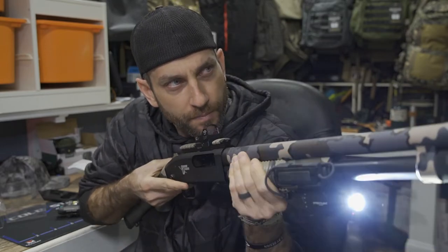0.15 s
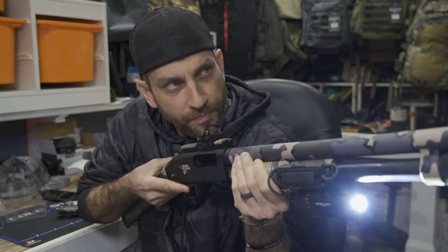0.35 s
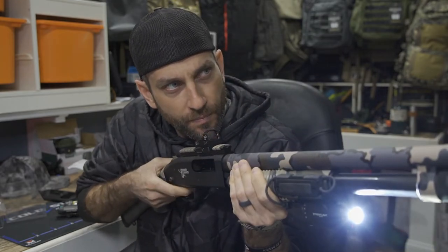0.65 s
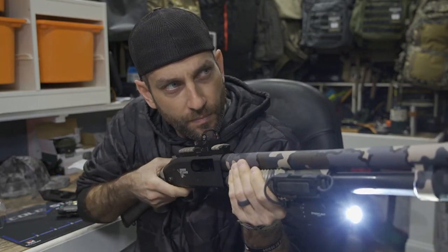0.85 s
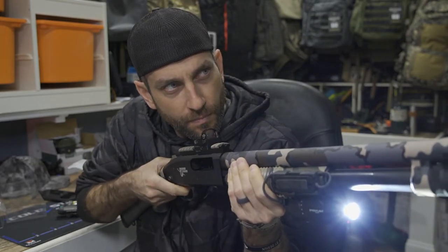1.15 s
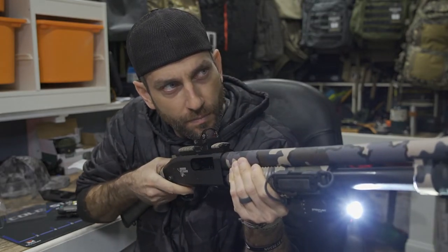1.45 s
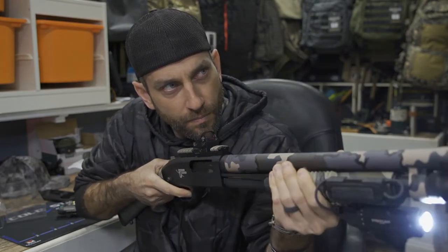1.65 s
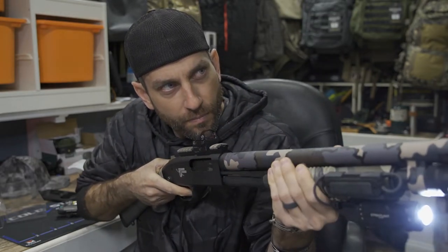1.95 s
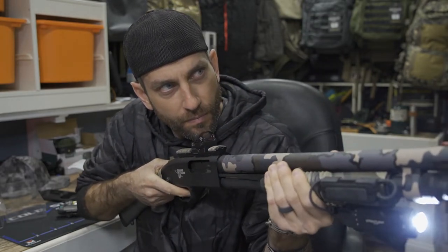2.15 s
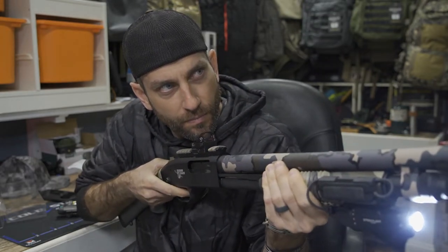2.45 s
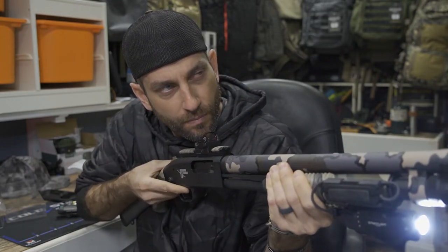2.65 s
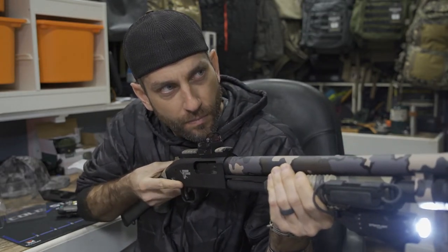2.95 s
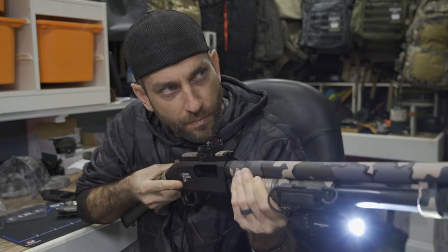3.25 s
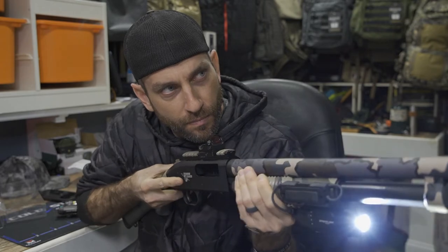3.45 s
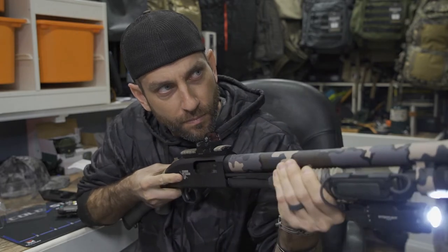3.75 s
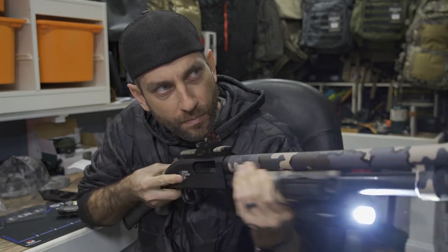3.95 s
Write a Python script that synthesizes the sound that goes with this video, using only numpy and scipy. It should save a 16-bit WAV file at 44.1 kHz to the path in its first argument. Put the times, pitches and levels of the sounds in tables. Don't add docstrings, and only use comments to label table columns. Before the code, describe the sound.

Close to the microphone in a small cluttered room, a shotgun forend is pulled back at once with a rattling scrape and hard clack. Faint clicks and cloth rubs follow, then a forward slam, a pause with a sharper handling click, and three quick strokes near the end. Thin high ringing hangs after the earlier slams.

```python
import sys
import numpy as np
from scipy import signal
from scipy.fft import rfft, irfft, next_fast_len
from scipy.io import wavfile
from scipy.ndimage import uniform_filter1d

SR = 44100
rng = np.random.default_rng(int(sys.argv[2]) if len(sys.argv) > 2 else 0)


def wav_out(sig):
    wavfile.write(sys.argv[1], SR, np.round(np.clip(np.atleast_2d(sig).T, -1, 1) * 32767).astype(np.int16))


def makeup_ratio(level_db):
    decades = np.asarray(level_db, float) / 20
    return 10 ** decades


N = 180721
TIME = np.arange(N) / SR
SLOT = 4096

# pitch in Hz, width in Hz, level in dB.
STOCK_RING = [(145, 49, -9.5), (283.3, 300, -7.5), (582, 230, 0), (968, 230, -3.5)]
# pitch in Hz, width in Hz, level in dB.
LOCKED_EDGES = [(6330, 1200, -0.5), (8860, 3200, -1.5), (11500, 3000, -6)]
# pitch in Hz, width in Hz, level in dB.
SLIDING_EDGES = [(5500, 1900, -1), (7800, 710, 1), (11700, 13000, -11.5)]


def soften(x, hz, kind):
    return signal.sosfilt(signal.butter(2, hz, kind, fs=SR, output="sos"), x)


def response(modes, size):
    hz = np.fft.rfftfreq(size, 1 / SR) + 1e-3
    gain = 0
    for k, (centre, width, db) in enumerate(modes):
        detuning = (hz / centre - centre / hz) * centre / width
        gain = gain + (-1) ** k * makeup_ratio(db) / (1 + 1j * detuning)
    return gain / np.sqrt(np.mean(abs(gain) ** 2))


def resonate(x, modes):
    size = 2 * next_fast_len(N // 2 + SLOT)
    return irfft(rfft(x, size) * response(modes, size=size))[:N]


def gritty(spread_db, rate):
    hold = int(SR / rate)
    steps = np.repeat(rng.standard_normal(N // hold + 1), hold)[:N]
    jumps = uniform_filter1d(steps, hold)
    x = rng.standard_normal(N) * makeup_ratio(spread_db * jumps)
    return x / np.std(x)


def steel(body, barrel, receiver, treble, bright, grit_db, stock_db):
    # pitch in Hz, width in Hz, level in dB.
    rubbed_receiver = [(1020, 500, -5), (1660, 630, -1)]
    out = resonate(barrel * gritty(grit_db, 1500), body)
    out = out + resonate(receiver * gritty(grit_db, 1500), rubbed_receiver)
    out = out + resonate(treble * gritty(grit_db, 2500), bright)
    return out + makeup_ratio(stock_db) * resonate(receiver * gritty(0, 1000), STOCK_RING)


def knocks(table, bright, stock_db, tick=2.5, after_db=-17, after_ms=17.0, grip=0.99):
    # pitch in Hz, width in Hz, level in dB.
    barrel_ring = [(2499, 300, -5.5), (2764, 260, 0), (3080, 160, 0), (3300, 190, -0.5), (3600, 230, 2),
                   (3783, 480, -1.5), (4600, 970, -5), (5900, 620, -11.5)]
    # pitch in Hz, width in Hz, level in dB.
    receiver_ring = [(1130, 440, -10), (1432, 170, -5), (1684.6, 160, 2.5), (2190, 510, -7)]
    spot_width_hz, spot_boost_db = 450, 7
    push = np.array([1.4, 2.2, 1.3, 1.8])
    out, t_ms = np.zeros(N + SLOT), np.arange(SLOT) * 1000 / SR
    gripped = [(hz, width * grip, db) for hz, width, db in receiver_ring]
    other_parts = [response(modes, size=SLOT) for modes in (gripped, bright, STOCK_RING)]
    for start, blow_db, spot_hz, receiver_db, treble_db, contact_ms in table:
        u = t_ms / contact_ms
        touching = np.clip(u / 0.81, 0, 1) * np.exp(-np.clip(u - 0.6, 0, None) * 2.4)
        rattle = makeup_ratio(after_db) * np.exp(-t_ms / after_ms)
        force = rng.standard_normal((4, SLOT)) * (touching + rattle) * np.clip((40 - t_ms) / 15, 0, 1)
        force[:, int(0.2 * contact_ms * SR / 1000)] += tick * np.sqrt(contact_ms) * push
        near = [(hz, width * grip, db + spot_boost_db * np.exp(-((hz - spot_hz) / spot_width_hz) ** 2))
                for hz, width, db in barrel_ring]
        parts = np.array([response(near, size=SLOT)] + other_parts)
        rung = irfft(rfft(force) * parts) * (t_ms < 80)
        peak = np.sqrt(2 * uniform_filter1d(rung ** 2, 64).max(axis=1))
        part_db = blow_db + np.array([0, receiver_db, treble_db, 0.32 * receiver_db + stock_db - 8.5])
        i = int((start - contact_ms * 0.15 / 1000) * SR)
        out[i:i + SLOT] += (makeup_ratio(part_db) / peak) @ rung
    return out[:N]


def timed(table, ms):
    rows = np.array(table)
    return np.column_stack([rows, ms * np.exp(-0.012 * (rows[:, 1] + 30))])


def quiet():
    # pitch in Hz, level in dB per Hz.
    air_shape = [(20, -3), (60, 1.5), (100, -6), (180, -2.5), (300, -12.5), (1000, -19), (5000, -29),
                 (15600, -35.5)]
    # pitch in Hz, level in dB.
    hum_tones = [(59.2, -78.5), (414.5, -81.5)]
    hz, db = np.transpose(air_shape)
    f = np.fft.rfftfreq(N, 1 / SR) + 1
    shape = makeup_ratio(np.interp(np.log(f), np.log(hz), db, -90, -90))
    air = irfft(rfft(rng.standard_normal(N)) * shape, N)
    waver_db = -2.5 * np.interp(TIME, np.arange(60) / 12, rng.standard_normal(60))
    hum = sum(makeup_ratio(d + 2.5 + waver_db) * np.sin(2 * np.pi * h * TIME) for h, d in hum_tones)
    return air * makeup_ratio(-69.5) / np.std(air) + hum


def shifting_hands():
    # loudest moment in seconds, level in dB, swelling in dB/s, dying in dB/s, treble in dB.
    rustles = [(0, -63, 300, 400, -14.5), (.36, -71.5, 70, 99.5, -13), (.48, -64, 330.5, 142.5, -14.5),
               (.92, -67.5, 130.5, 148.5, -11), (1.39, -70, 399.5, 300, -16.5),
               (1.46, -59.5, 422, 323, -12), (2.2, -75.5, 500, 63, -18.5), (2.27, -55, 398, 407, -11),
               (2.51, -69.5, 300, 61.5, -8), (2.58, -67.5, 128, 254.5, -3.5),
               (2.73, -59.5, 165, 229.5, -11.5), (2.88, -80, 42.5, 60, -11.5), (3.33, -71.5, 299, 94, -14),
               (3.501, -63, 207, 897, -7.5), (3.89, -75, 84.5, 900, -9.5)]
    # pitch in Hz, width in Hz, level in dB.
    sleeve = [(2440, 1000, -2.5), (3600, 650, 3.5)]
    rub, treble = 0, 0
    for loudest, db, swelling, dying, treble_db in rustles:
        slope = np.where(TIME < loudest, swelling, dying)
        shift = makeup_ratio(db - slope * abs(TIME - loudest))
        rub, treble = rub + shift, treble + makeup_ratio(treble_db) * shift
    return steel(sleeve, rub, rub * makeup_ratio(-2), treble, SLIDING_EDGES, grit_db=2.0, stock_db=-8.0)


def loose_taps():
    # start in seconds, blow in dB, pitch of the struck spot in Hz, receiver in dB next to the blow.
    tap_times = [(0.0461, -31.5, 3400, -13.5), (0.3592, -57, 3380, -6), (0.3908, -67.5, 2500, 3),
                 (0.5805, -51, 3570, -5), (0.5984, -63.5, 3460, 5.2), (0.83, -66, 3230, -3),
                 (1.3986, -64, 2740, -1), (2.2154, -52, 3320, 0.8), (2.6564, -54, 3100, 10),
                 (2.9797, -56, 3600, -9), (2.999, -46, 3650, 1)]
    rows = timed([(*row, -23) for row in tap_times], 2.2)
    taps = knocks(rows, LOCKED_EDGES, stock_db=-24.5, tick=1.2, after_db=-11.5, grip=1.1)
    return soften(taps, 5000, "low")


def stroke(table, last_hz):
    first_hz, scatter_hz = 3250, 180
    rows = np.array(table)
    along = (rows[:, 0] - rows[0, 0]) / (rows[-1, 0] - rows[0, 0])
    spot = first_hz + (last_hz - first_hz) * along + scatter_hz * rng.standard_normal(len(rows))
    return np.insert(rows, 2, spot, axis=1)


def pump_strokes():
    # start in seconds, blow in dB, receiver in dB and treble in dB
    # next to the blow, contact in ms.
    back_1 = [(0.0549, -11.5, -5.5, -9, 4.4), (0.0649, -13, -10, -0.5, 2.35), (0.0713, -17, -5, -12.5, 4.1),
              (0.0759, -14.5, -5.5, -5.5, 7), (0.0815, -16.5, -5, -6.5, 2.8), (0.0901, -15, -5, -9, 2.1),
              (0.0987, -12, -13.5, -5, 3), (0.1097, -11.5, -19, -7.5, 3), (0.1141, -10.5, -17, -2.5, 2.1),
              (0.1217, -13, -10, -0.04, 5.3), (0.1246, -17, -9.5, 0.75, 7.6), (0.144, -2, -10.5, -1, 3.7),
              (0.1589, -10, 1.6, -0.3, 4.3), (0.1791, -16, -10.5, -9.5, 5.6),
              (0.1854, -15.5, -13.5, -8.5, 5.3)]
    # seconds, dB, dB, dB, ms.
    forward_1 = [(1.5609, -20, -5, -14, 2.3), (1.5653, -24, -4.5, -5, 5.9), (1.5712, -21.5, -5, -4, 4.4),
                 (1.5766, -9, -8, -9, 3.3), (1.584, -17.5, -8, -13.5, 2.2), (1.5892, -17, -8.5, -13.5, 2.1),
                 (1.5976, -12.5, -5.5, 1, 2.9), (1.6031, -11, -10, -1.5, 4.9),
                 (1.633, -9.5, -5.5, -12, 3.0), (1.6622, -9, -10.5, -12.5, 3.3),
                 (1.6639, -2, -11, -7.5, 2.7), (1.6743, -8, -9.5, 2, 2.9), (1.6791, -9, -6, -3, 2.5),
                 (1.6841, -4, -11, -3.5, 3.1), (1.7067, -12.5, -9.5, -8, 3.9),
                 (1.7145, -12.5, -16, -12, 2.2), (1.7241, -13.5, -17.5, -7.5, 6.7)]
    # seconds, dB, dB, dB, ms.
    back_2 = [(3.011, -11.5, -2, -12, 4.8), (3.027, -17.5, -2, -0.9, 2.1), (3.0358, -13, -4.5, -4, 3.3),
              (3.041, -11.5, -5.5, -9.5, 4.5), (3.071, -21, -5, -4.5, 3.3), (3.0807, -21, -7, -2, 1.8),
              (3.0988, -13.5, -18, -7, 3.1), (3.1202, -21.5, -3, -8.5, 2.3), (3.126, -13.5, -17.5, -5, 4.4),
              (3.1307, -16, -8, -3.5, 4.4), (3.1371, -13, -6, -5, 4.5), (3.1552, -2.5, -7.5, -3.5, 3.2),
              (3.1742, -7.5, 0.5, 0.6, 3.3), (3.1958, -14.5, -7.5, -8.5, 2.1), (3.204, -20, -7, -4.5, 3.9)]
    # seconds, dB, dB, dB, ms.
    forward_2 = [(3.5206, -22.5, 0.5, -4, 3.0), (3.5304, -12, -11, -6, 3), (3.5343, -10, -13.5, -11.5, 2.1),
                 (3.538, -16.5, -3.5, -3, 6.5), (3.5467, -15, -7.5, -8.5, 4.7), (3.554, -11, -4.5, 1, 8),
                 (3.576, -14, -11.5, -5.5, 3.3), (3.5834, -2, -10, -9.5, 3.9), (3.6106, -3, -16, -7, 4.7),
                 (3.618, -10.5, -9.5, -3.5, 1.3), (3.6223, -5.5, -4, 1.3, 4.7),
                 (3.6312, -8, -6.5, -0.2, 2.9), (3.6518, -13, -12.5, -12.5, 3.9),
                 (3.658, -14, -22, -8, 1.6), (3.665, -13, -17.5, -12, 4.7), (3.6738, -13, -12, -11.5, 3.9)]
    # seconds, dB, dB, dB, ms.
    back_3 = [(3.9088, -9, -10.5, -5, 2.6), (3.9124, -17, -4, -13, 5.9), (3.9249, -8.5, -7, -8.5, 4.6),
              (3.9329, -12, -14, -2, 3.1), (3.9392, -13.5, -4.5, -8.5, 1.7),
              (3.9449, -13, -10.5, -2.5, 5.5), (3.9496, -13.5, -7.5, -3, 7.2),
              (3.9649, -12.5, -13.5, -10, 1.8), (3.9746, -13, -11.5, -3, 2.7),
              (3.9803, -12, -16.5, -5.5, 2.3), (3.9887, -8, -17, 1, 4.5), (4.0063, 0.2, -12.5, -7.5, 2.9),
              (4.021, -8, -3.25, 1.5, 3.5), (4.038, -16, -8, -4.5, 2.4)]
    # start in seconds, blow in dB, pitch of the struck spot in Hz,
    # receiver in dB and treble in dB next to the blow.
    slack = [
        (1.542, -32, 3840, -3, -6),
        (3.5044, -32, 4050, -3.4, -14),
        (3.886, -18, 2708, -6.5, -22),
    ]
    # pitch in Hz, width in Hz, level in dB.
    moving_edges = [(6190, 1100, 5), (9050, 1800, 2.5), (11740, 3300, 1), (14000, 1800, -1)]
    strokes = [stroke(rows, 3940) for rows in (back_1, back_2, back_3)]
    strokes += [stroke(rows, 4031) for rows in (forward_1, forward_2)]
    return knocks(np.vstack(strokes + [timed(slack, 0.8)]), moving_edges, stock_db=-13.5)


def sliding():
    # start in seconds, slide in dB, loudest moment in seconds, loudest in dB, dying in dB/s.
    scrapes = [
        (.056, -27, 0.16, -18, 380.5),
        (1.575, -25.5, 1.694, -22, 309.5),
        (3.012, -29, 3.185, -23, 411),
        (3.54, -23.5, 3.6433, -21, 311),
        (3.915, -26.5, 4.025, -16.5, 418.5),
    ]
    creep_s, swell_s, shoulder_s, settle_s = 0.0056, 0.055, 0.033, 0.038
    slide, shiver, treble = 0, 0, 0
    for start, slide_db, loudest, loud_db, dying in scrapes:
        s = [start - creep_s, start, loudest - swell_s, loudest, loudest + shoulder_s]
        db = np.interp(TIME, s, [slide_db - 26.5, slide_db, slide_db, loud_db, loud_db - 4.5])
        db = db - 601 * np.clip(s[0] - TIME, 0, 1)
        gain = makeup_ratio(db - dying * np.clip(TIME - s[-1], 0, 1))
        treble_db = np.interp(TIME, s[:2] + [loudest, loudest + 0.2], [-22, -16, -5.5, -9.5])
        settled = np.clip((TIME - loudest) / settle_s, 0, 1)
        slide = slide + gain * np.sqrt(1 - settled)
        shiver = shiver + gain * np.sqrt(settled)
        treble = treble + gain * makeup_ratio(treble_db)
    return slide, shiver, treble


def scraping_bars():
    # pitch in Hz, width in Hz, level in dB.
    tube = [(2520, 990, -6), (3500, 890, -0.5), (4060, 830, -2)]
    # pitch in Hz, width in Hz, level in dB.
    loose_parts = [(2600, 980, -9), (3855, 630, 1.5), (4740, 1200, -2.5), (5740, 1000, -7)]
    slide, shiver, treble = sliding()
    grain = makeup_ratio(18 * uniform_filter1d(rng.standard_normal(N), 150))
    receiver = slide * makeup_ratio(-11.0) + shiver * makeup_ratio(-17)
    bars = steel(tube, slide * grain, receiver * grain, treble * grain, SLIDING_EDGES, grit_db=0.1, stock_db=-7.5)
    return bars + resonate(shiver * makeup_ratio(-0.15) * gritty(1.6, 600), loose_parts)


def slams():
    # start in seconds, lower boom in dB, upper boom in dB, air jolt in dB.
    slam_times = [
        (.15, -39.5, -39.5, -59),
        (1.685, -38.5, -51, -45),
        (3.175, -49.5, -42.5, -40.5),
        (3.63, -41, -47.5, -35.5),
        (4.007, -37, -34.5, -28.5),
    ]
    # pitch in Hz, time to fall 60 dB in seconds.
    boom_tones = [(178, 0.26), (218, 0.28)]
    out = np.zeros(N)
    for start, *boom_db, jolt_db in slam_times:
        t = np.clip(TIME - start, 0, None)
        for (hz, t60), db in zip(boom_tones, boom_db):
            out += makeup_ratio(db - 60 * t / t60) * (1 - np.exp(-t / 0.0033)) * np.sin(2 * np.pi * hz * t)
        out += makeup_ratio(jolt_db - 3.5) * np.exp(-t / 0.01) * np.sin(2 * np.pi * 84 * t)
    return soften(out, 37, "high")


def tone(hz, start, stop, db, t60):
    t = np.clip(TIME - start, 0, None)
    damping = np.clip((stop - TIME) / 0.0041, 0, 1)
    return damping * makeup_ratio(db - 60 * t / t60) * np.sin(2 * np.pi * hz * t)


def singing():
    # struck in seconds, damped in seconds, low tone in dB, its 60 dB fall in seconds, high tone in dB.
    rings = [
        (0.153, 1.42, -55.5, 1.9, -79.5),
        (1.684, 2.9, -49, 1.2, -62.5),
        (3.174, 3.525, -52.5, 1.06, -89.5),
        (3.639, 3.906, -38, 1.43, -50),
    ]
    pitches = (9103.5, 12340)
    start, stop, db, t60 = rings[0][:4]
    out = tone(pitches[0] - 40, start, stop, db - 12, t60)
    for start, stop, low_db, low_t60, high_db in rings:
        out = out + tone(pitches[0], start, stop, low_db, low_t60)
        out = out + tone(pitches[1], start, stop, high_db, 0.9)
    return out


def handling_clicks():
    # start in seconds, blow in dB, pitch of the struck spot in Hz,
    # receiver in dB and treble in dB next to the blow.
    click_times = [(0.4839, -32, 3170, -3, -24), (0.9526, -42.5, 2530, -7.5, -14),
                   (2.2326, -20, 3078, -6.5, -18), (2.2493, -25.5, 3428, -6, -10.5),
                   (2.693, -50.5, 3000, -8, -16), (2.7023, -31, 3410, -2, -12.5),
                   (2.707, -31.5, 3300, -15, -11.5), (2.7118, -15.5, 3500, -9.5, -7.5),
                   (2.7159, -27, 3290, -10, -16), (2.7197, -26, 3807, -11, -21.5),
                   (2.7316, -33, 3320, -19, -11.5), (3.8555, -57, 3010, -3.5, -16),
                   (3.8816, -37, 3600, 2.2, 1)]
    clicks = knocks(timed(click_times, 1.9), LOCKED_EDGES, stock_db=-39.5, tick=3.3,
                    after_db=-8.5, after_ms=8.0, grip=4.4)
    return soften(clicks, 9500, "low")


def release_latch():
    # start in seconds, blow in dB, pitch of the struck spot in Hz,
    # receiver in dB and treble in dB next to the blow.
    latch_times = [(0.861, -48, 2860, 4, -12), (0.8643, -44, 2880, -3, -0.6),
                   (0.8705, -41.5, 3094, -5, -10), (0.8757, -45.5, 2780, 3, -3),
                   (0.8905, -47.5, 3450, -1, -1), (0.8945, -42.5, 3250, 4, -9),
                   (0.899, -44.5, 3576, 5.5, -5), (1.4248, -44, 3850, -0.9, 0),
                   (1.4307, -45.5, 3390, 3, 2.5), (1.4343, -43.5, 3453, 5, 7.5),
                   (1.4385, -30, 3513, -4, -13)]
    # pitch in Hz, width in Hz.
    leaf = (10400, 350)
    bright = [(leaf[0], leaf[1], 0), (7000, 9000, -16)]
    return knocks(timed(latch_times, 2.9), bright, stock_db=-33.0, tick=3.1, after_db=-9.5, after_ms=8.0, grip=1.2)


def room(x):
    # pitch in Hz, time to fall 60 dB in seconds, level in dB.
    echo_bands = [(507, 0.083, -18.5), (1480, 0.073, -25.5), (3500, 0.1, -20), (7000, 0.097, -14),
                  (12000, .13, -47.5)]
    t = np.arange(SR // 2) / SR
    tail = 0
    for hz, t60, db in echo_bands:
        sos = signal.butter(2, [hz / 2.4, hz * 1.7], "band", fs=SR, output="sos")
        band = signal.sosfilt(sos, rng.standard_normal(len(t)))
        band = band * makeup_ratio(-60 * t / t60) * np.clip((t - 0.003) / 0.031, 0, 1)
        tail = tail + makeup_ratio(db) * band / np.sqrt(np.sum(band ** 2) * SR / (2 * hz))
    power = abs(rfft(tail)) ** 2
    evening = np.sqrt(uniform_filter1d(power, size=500) / uniform_filter1d(power, size=50))
    tail = irfft(rfft(tail) * evening)
    return signal.fftconvolve(x, tail[:SR // 3])[:N]


def scene():
    gun = shifting_hands() + loose_taps() + pump_strokes() + scraping_bars()
    gun = gun + handling_clicks() + release_latch()
    return (quiet() + gun + makeup_ratio(1.0) * room(gun) + slams() + singing())[None]


def roll_off(x):
    return signal.sosfilt(signal.butter(12, 15700, fs=SR, output="sos"), x)


def record(dry):
    flat = np.clip(dry, -1, 1)
    flat = flat + soften(dry - flat, 170, "low")
    mix = flat * np.sqrt(np.interp(TIME, [4.083, 4.099], [1, 0]))
    return roll_off(mix)


dry = scene()
out = record(dry)
wav_out(out)
```